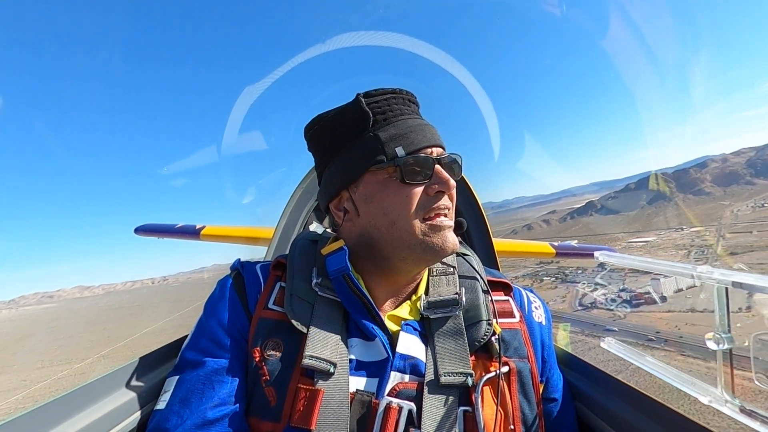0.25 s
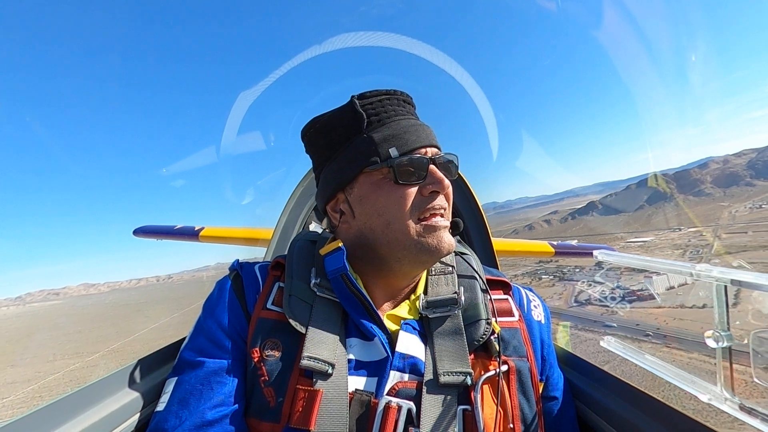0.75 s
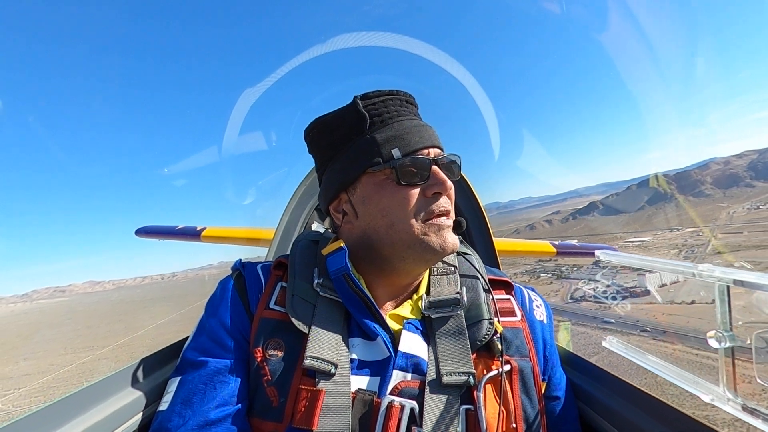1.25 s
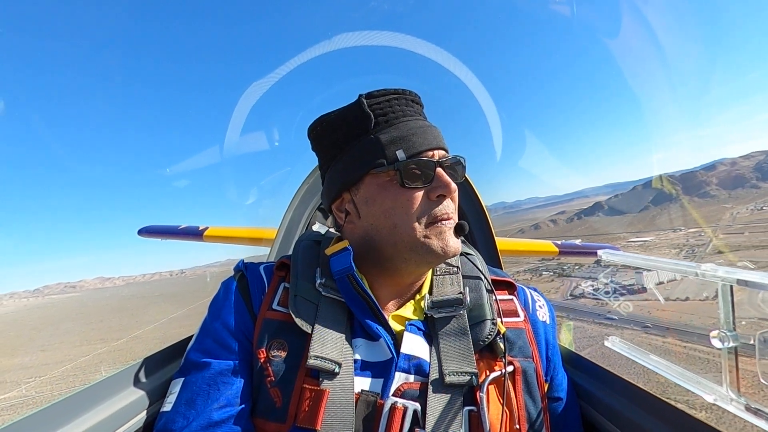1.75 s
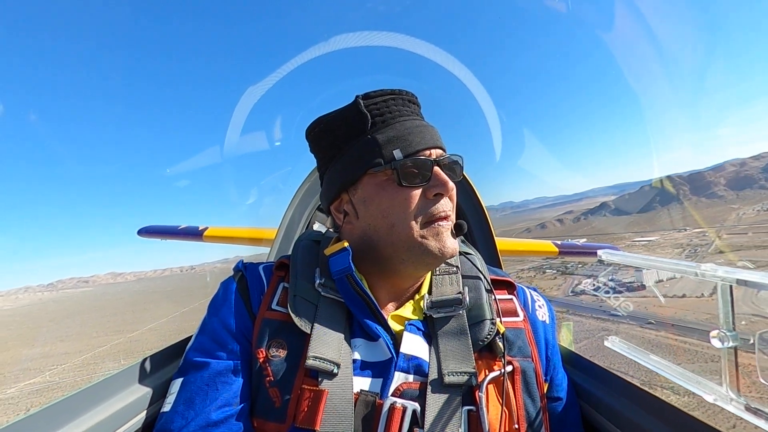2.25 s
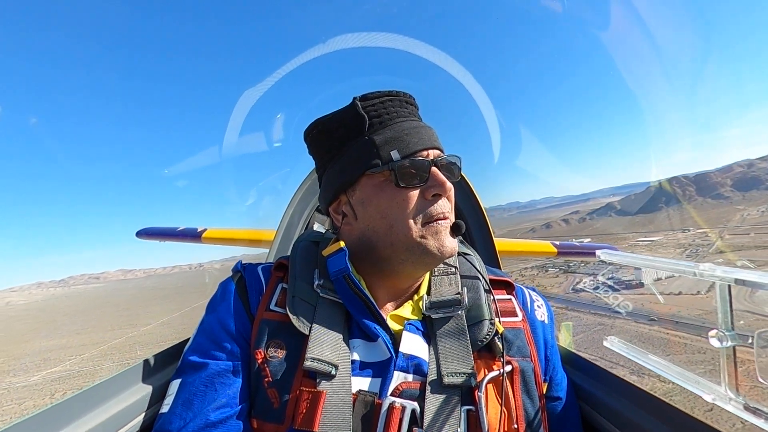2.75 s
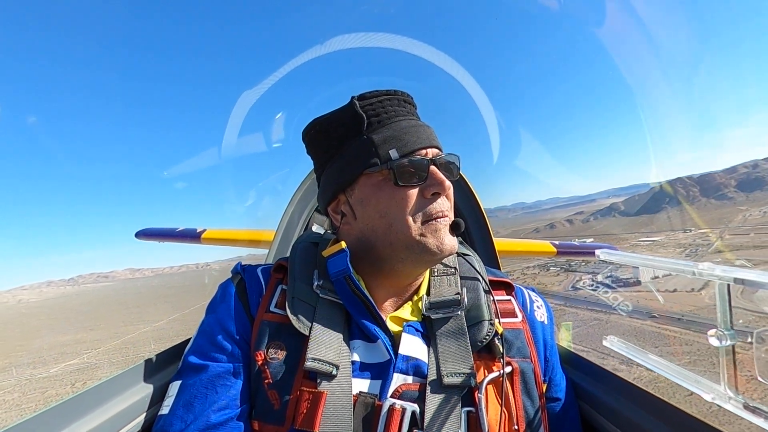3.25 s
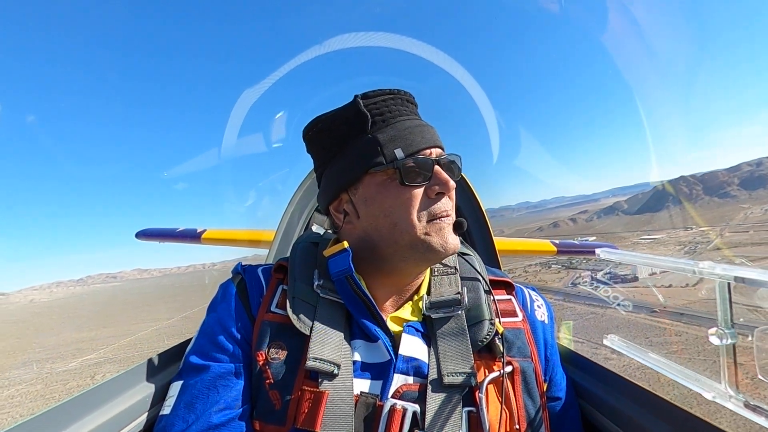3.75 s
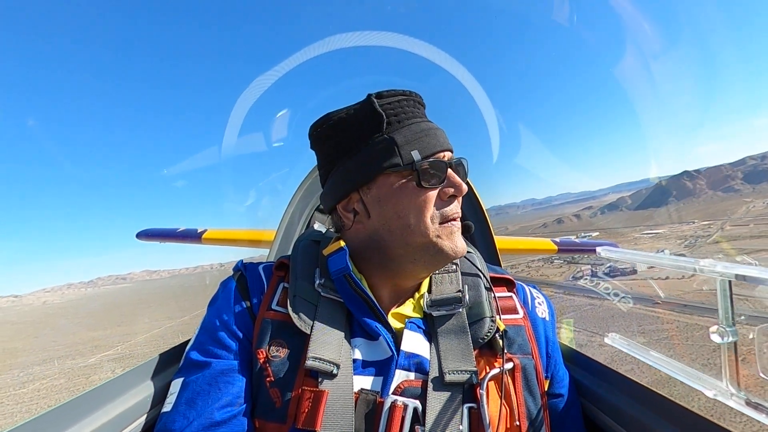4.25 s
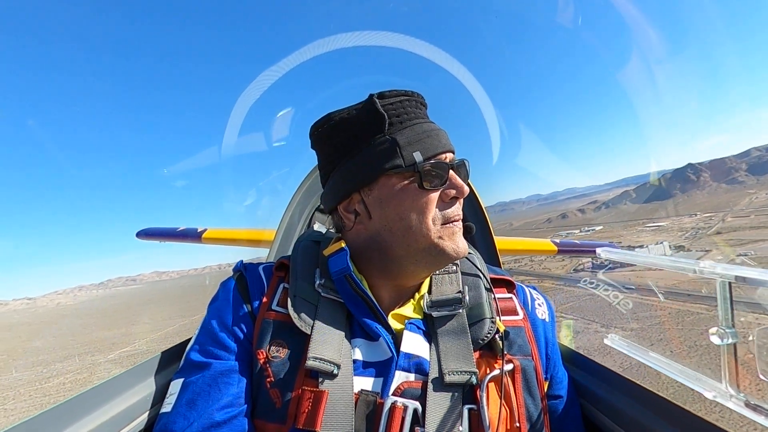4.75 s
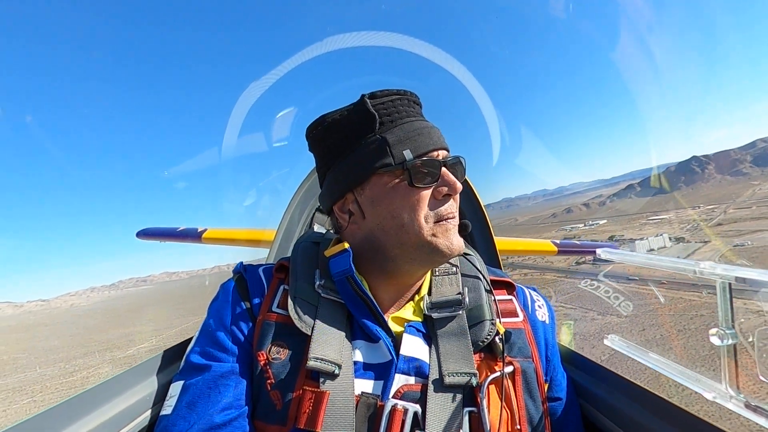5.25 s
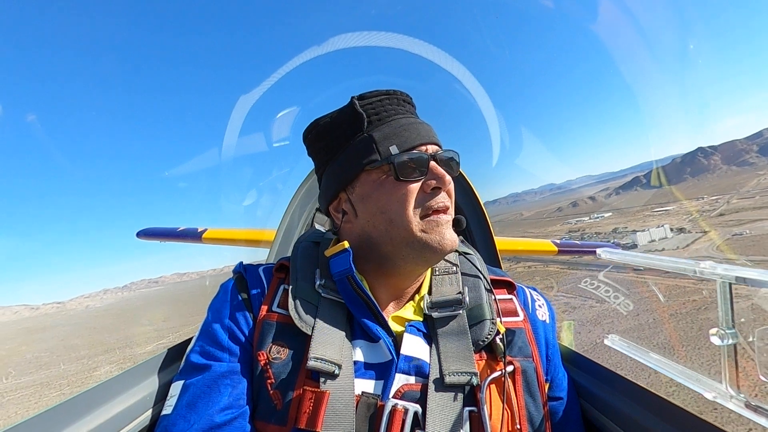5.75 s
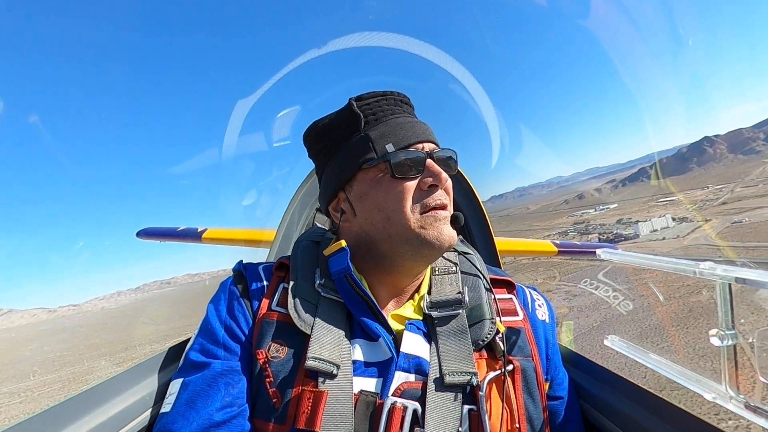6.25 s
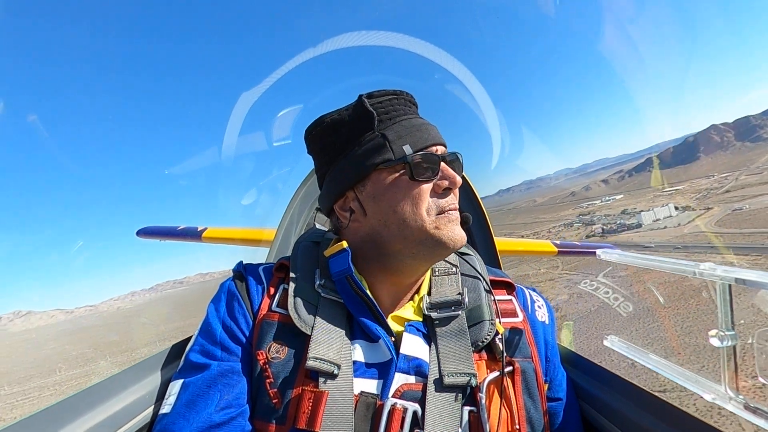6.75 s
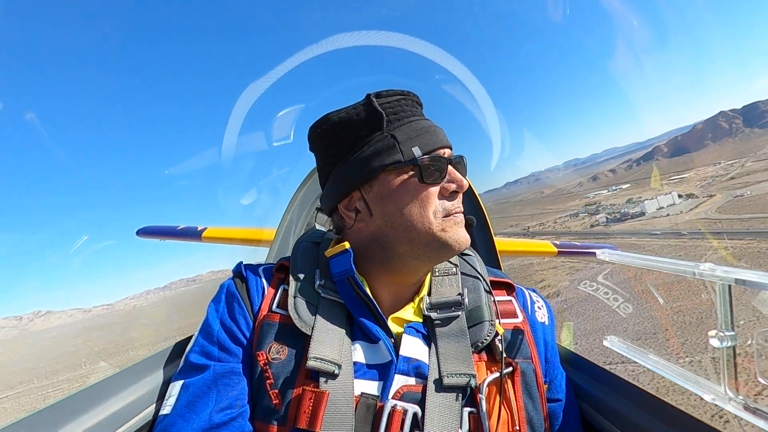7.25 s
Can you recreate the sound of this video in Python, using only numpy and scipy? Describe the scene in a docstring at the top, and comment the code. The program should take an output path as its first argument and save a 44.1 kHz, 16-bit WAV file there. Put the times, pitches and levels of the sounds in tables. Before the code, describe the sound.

From 0 to about 7.5 seconds, a small propeller plane in flight is heard from inside its cockpit, already at full steady roar. A six-cylinder piston engine makes a loud, deep drone around 140 hertz, with strong overtones and in-between tones from uneven cylinders that waver quickly and give a rough, throbbing buzz. Pulsing exhaust rasp rings the cabin in the midrange, and low rumble shakes the airframe. From roughly 1.1 to 1.7 seconds the pitch sags very slightly, then creeps back up by about 5.3 seconds and holds. Throughout, broad turbulent air hisses over the canopy with faint resonant colour, gradually swelling with the rumble as speed builds, while the firing drone eases slightly. Bass is centred, the air wider in stereo; dense and continuous, cut off at the end without fading.

```python
"""A six-cylinder aircraft engine and its propeller drone at governed speed, heard inside the cockpit.
Tones at multiples of crankshaft speed make the drone; uneven cylinders add half orders.
Noise pulsed by the firings makes the exhaust rasp, ringing the cabin, and the airframe rumble.
Noise through canopy resonances makes the air rush, a little louder as the plane gathers speed.
Two microphone ports hear it, the bass in mono."""
import sys
import numpy as np
from scipy import signal
from scipy.fft import rfft, irfft, next_fast_len
from scipy.io import wavfile
from scipy.ndimage import uniform_filter1d, minimum_filter1d, map_coordinates

SR = 44100
rng = np.random.default_rng(int(sys.argv[2]) if len(sys.argv) > 2 else 0)


def int16_out(signal):
    """Quantize to a 16-bit WAV file."""
    q = np.round(np.clip(np.atleast_2d(signal).T, -1, 1) * 32767)
    wavfile.write(sys.argv[1], SR, q.astype(np.int16))


N = 330750

FIRINGS_PER_TURN = 3  # six cylinders, four-stroke


def amp(db):
    """Decibels to gain."""
    return 10 ** (np.asarray(db) / 20)


def along(points, hz):
    """Each column after the frequency, interpolated on a log-frequency axis."""
    point_hz, *columns = np.transpose(points)
    return [np.interp(np.log(hz + 1), np.log(point_hz + 1), column) for column in columns]


def wobble(knots_per_s):
    """A smooth random curve through normally distributed knots."""
    knots = rng.standard_normal(1024)
    coarse = np.arange(0, N + 64, 64)
    values = map_coordinates(knots, [coarse * knots_per_s / SR], mode="wrap")
    return np.interp(np.arange(N), coarse, values)


def filtered(x, response):
    """x times a complex response of frequency."""
    size = next_fast_len(N + 8192)
    hz = np.fft.rfftfreq(size, 1 / SR)
    return irfft(rfft(x, size) * response(hz), size)[..., :N]


def white():
    """Two unrelated noises of 0 dB per Hz."""
    return rng.standard_normal((2, N)) * np.sqrt(SR / 2)


def coloured(x, spectrum, resonances=()):
    """x through a broad spectrum with resonant humps on it."""
    def response(hz):
        level_db = along(spectrum, hz)[0]
        for centre_hz, width_hz, lift_db in resonances:
            level_db = level_db + lift_db / (1 + (2 * (hz - centre_hz) / width_hz) ** 2)
        return amp(level_db)
    return filtered(x, response)


def crank_turns():
    """Crankshaft angle in turns: the governed speed sags once and recovers."""
    # governed speed: time_s, speed_rpm
    rpm_points = [(0, 2780), (1.1, 2780), (1.7, 2773.5), (5.3, 2783), (7.5, 2782)]
    time_s, speed_rpm = np.transpose(rpm_points)
    rpm = np.interp(np.arange(N) / SR, time_s, speed_rpm)
    return np.cumsum(rpm) / SR / 60


def drone(turns, drone_db, firing_waver_db, uneven_waver_db, high_waver_db,
          drift_rad, firing_smear_rad, uneven_smear_rad, uneven_lead_turns):
    """The firing beat is a steady pulse wave; orders between come from unequal cylinders and waver more."""
    # engine and propeller tones before drone_db and waver: order (multiple of crank speed), level_db (rms)
    order_levels = [(1, -35.5), (2, -29), (3, -14), (4, -48), (4.5, -25), (5, -33), (6, -21.5), (6.5, -47),
                    (7, -29.2), (7.5, -33.5), (8, -40.5), (9, -40.5), (10, -40), (11, -45.5), (11.5, -49.5),
                    (12, -51), (15, -38), (16.5, -39), (17, -43), (17.5, -40), (20.5, -41.5), (21, -43.5),
                    (26.5, -49), (27, -46.5)]
    out = np.zeros(N)
    for order, db in order_levels:
        order = np.round(order * 2) / 2  # a four-stroke cycle lasts two turns
        waver, sway = wobble(5.5), wobble(8.3)
        angle = 2 * np.pi * order * turns + drift_rad * order * sway
        harmonic = order / FIRINGS_PER_TURN
        # the cabin smears each pulse: high orders arrive later than low ones
        if harmonic % 1 == 0:
            lag = firing_smear_rad * harmonic * (harmonic - 1)
            level_db = db + drone_db + firing_waver_db * harmonic * waver
        else:
            lag = uneven_smear_rad * order ** 2 - 2 * np.pi * order * uneven_lead_turns
            level_db = db + (uneven_waver_db + high_waver_db * order) * waver
        out += amp(level_db) * np.cos(angle - lag)
    return np.sqrt(2) * out  # rms to peak


def puffs(turns, depth):
    """Gas flow swells at each firing."""
    return 1 + depth * np.cos(2 * np.pi * FIRINGS_PER_TURN * turns)


def exhaust(turns, flutter_db):
    """Puffs of turbulent gas ring the cabin, pulsing slightly with each turn of the propeller."""
    # rasp before resonances and airflow gain: freq_hz, level_db (per Hz)
    rasp_spectrum = [(150, -88), (400, -61.5), (560, -63), (660, -55), (800, -55), (900, -60.5),
                     (1100, -65.5), (1500, -71), (3000, -75.5), (8000, -120)]
    # cabin resonances: centre_hz, width_hz, lift_db
    cabin_modes = [(485, 45, 11.5), (762, 100, 7), (965, 82, 4.5), (1212, 80, 8)]
    propeller = 1 + 0.051 * np.cos(2 * np.pi * turns)
    gas = white() * puffs(turns, depth=0.039) * propeller
    gas *= amp(flutter_db * wobble(25))
    return coloured(gas, rasp_spectrum, cabin_modes)


def rumble(turns):
    """No two firings are alike: their scatter, as noise pulsed by the firings, shakes the airframe."""
    # airframe rumble before airflow gain: freq_hz, level_db (per Hz)
    rumble_spectrum = [(8, -73.5), (20, -64), (35, -58.5), (56, -49), (85, -43.5), (115, -48.5), (170, -50),
                       (210, -48), (280, -50), (330, -49), (395, -61.5), (700, -80.5), (1500, -120)]
    return coloured(white() * puffs(turns, depth=0.2), rumble_spectrum)


def slipstream(air_db, flutter_db):
    """Turbulent air rushes over the canopy and excites its resonances."""
    # air rush before resonances and airflow gain: freq_hz, level_db (per Hz)
    air_spectrum = [(200, -90), (700, -61.5), (1300, -64), (1900, -64), (2600, -66.5), (3900, -64.5),
                    (4700, -68.5), (5750, -72.5), (6150, -77.5), (7500, -82.5), (9000, -92.5),
                    (10200, -101), (12300, -99), (15000, -113)]
    # canopy resonances: centre_hz, width_hz, lift_db
    canopy_modes = [(1788, 110, 4.5), (2294, 70, 3), (2503, 47, 5.5), (3030, 83, 5), (3506, 130, 5.5),
                    (5820, 110, 2.5)]
    air = white() * amp(air_db + flutter_db * wobble(35))
    return coloured(air, air_spectrum, canopy_modes)


def ports(field):
    """Shared and unshared sound reach two microphone ports; in the bass both carry one signal."""
    # port pair: freq_hz, likeness (0-1), left_lead_rad, left_minus_right_db; first two unused in the bass
    port_pair = [(1020, 1, 0, 3), (1130, 1, 0.33, 1.5), (1330, .82, 1.45, 0), (1610, 0.6, 1.6, 2.5),
                 (1850, .8, 1.2, 4.5), (2200, .8, .7, 2.5), (2850, .83, 0.82, 1.5), (4000, 0.86, 0.73, -.5),
                 (6000, 0.74, 0.079, 0), (8050, 0.7, .2, -1), (9000, .8, 0, 3), (11000, .5, 0.27, 1.5)]

    def gains(hz, side):
        likeness, lead_rad, balance_db = along(port_pair, hz)
        stereo = hz > 1020
        turn_rad = stereo * np.arccos(np.clip(likeness, 0, 1)) / 2
        lead_rad = stereo * lead_rad
        tilt = amp(balance_db / 2)
        # keeps the level of the sum
        centre = np.sqrt(tilt ** 2 + tilt ** -2 + 2 * np.cos(2 * turn_rad) * np.cos(lead_rad)) / 2
        mix = np.array([np.cos(turn_rad), side * np.sin(turn_rad)])
        return mix * (tilt * np.exp(0.5j * lead_rad)) ** side / centre

    left, right = [filtered(field, lambda hz: gains(hz, side)).sum(axis=0) for side in (1, -1)]
    return np.array([left, right])


def limiter(x, ceiling_db, hold_s):
    """The gain ducks smoothly around each peak that would pass the ceiling."""
    size = int(hold_s * SR) | 1
    peak = np.abs(x).max(axis=0) + 1e-9
    needed = np.minimum(1, amp(ceiling_db) / peak)
    return x * uniform_filter1d(minimum_filter1d(needed, size), size)


def scene():
    """One crankshaft drives tones, rasp and rumble; air rush, rumble and rasp grow with airflow."""
    t = np.arange(N) / SR
    turns = crank_turns()
    # the plane gathers speed towards a limit
    air_start_db, air_limit_db, speed_up_s = -1.08, 2.5, 6.2
    air_db = air_limit_db + (air_start_db - air_limit_db) * np.exp(-t / speed_up_s)
    # the firing beat slowly eases
    drone_start_db, drone_ease_db_per_s = 0.74, 0.2
    drone_db = drone_start_db - drone_ease_db_per_s * t
    rumble_db_per_air_db, rasp_db_per_air_db = 1.4, 0.33

    field = slipstream(air_db, flutter_db=0.45)
    # more airspeed also shakes the airframe harder
    field += amp(rumble_db_per_air_db * air_db) * rumble(turns)
    field += amp(rasp_db_per_air_db * air_db) * exhaust(turns, flutter_db=0.15)
    # the tones go into the sound that both ports share
    field[0] += drone(turns, drone_db, firing_waver_db=0.2, uneven_waver_db=0.84, high_waver_db=0.1318,
                      drift_rad=0.016, firing_smear_rad=0.513, uneven_smear_rad=0.375,
                      uneven_lead_turns=0.3102)
    return ports(field)


def record(dry):
    """Peaks are limited, then everything from the band limit up is removed."""
    top_hz = 15100
    limited = limiter(dry, ceiling_db=-2.5, hold_s=0.014)
    return filtered(limited, lambda hz: hz < top_hz)


dry = scene()
out = record(dry)
int16_out(out)
```